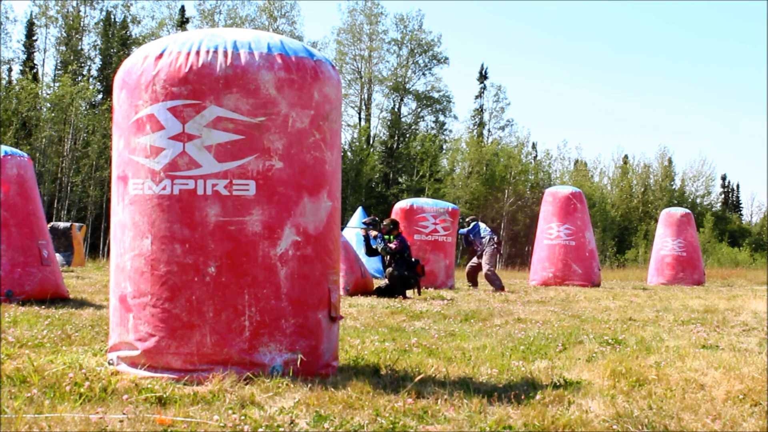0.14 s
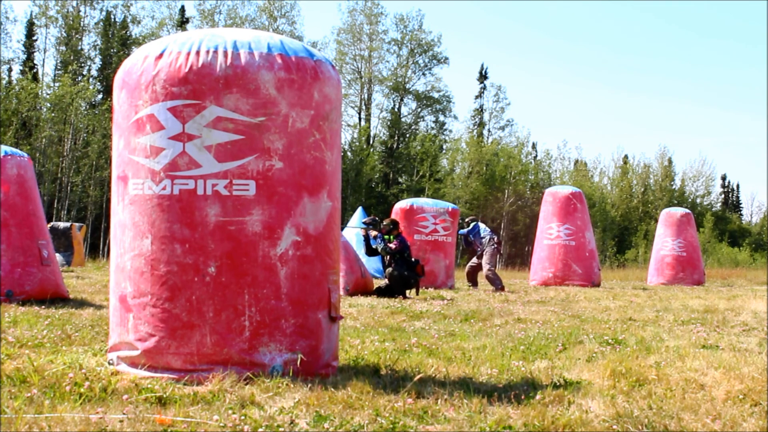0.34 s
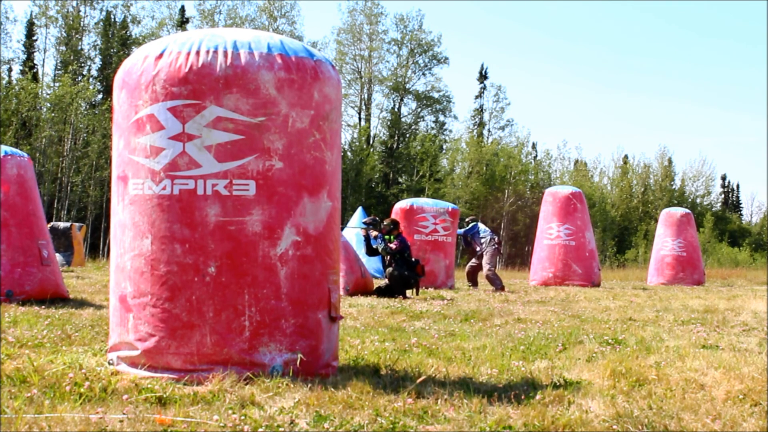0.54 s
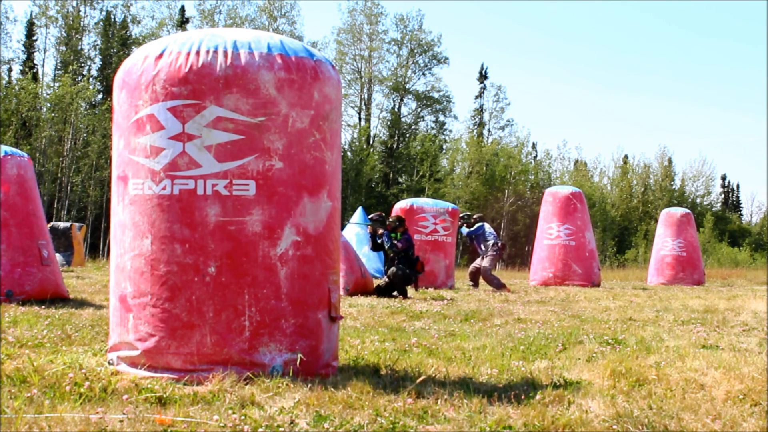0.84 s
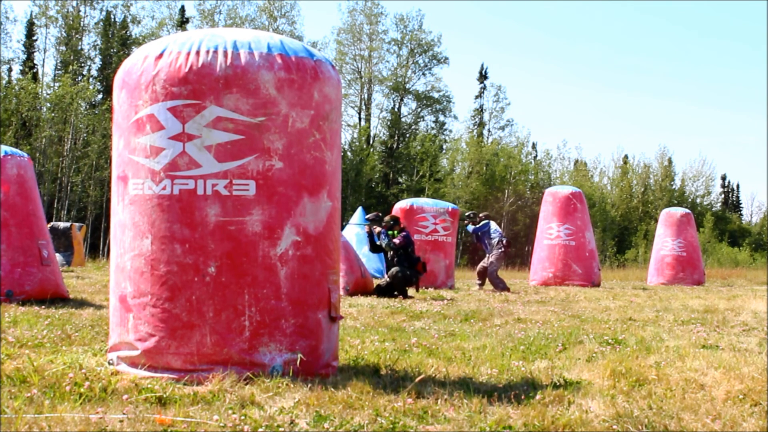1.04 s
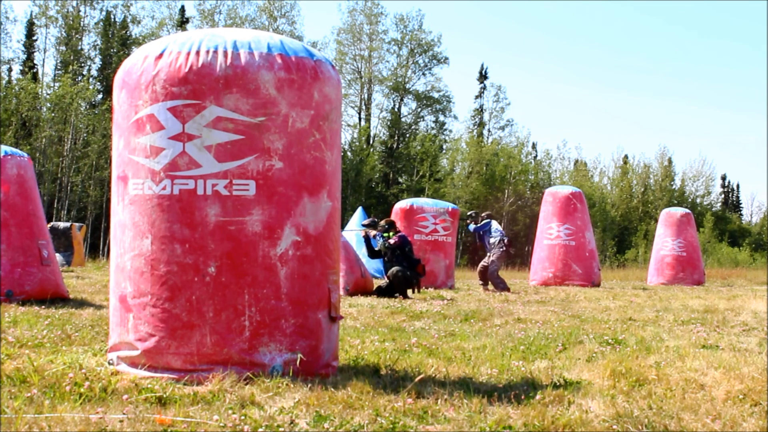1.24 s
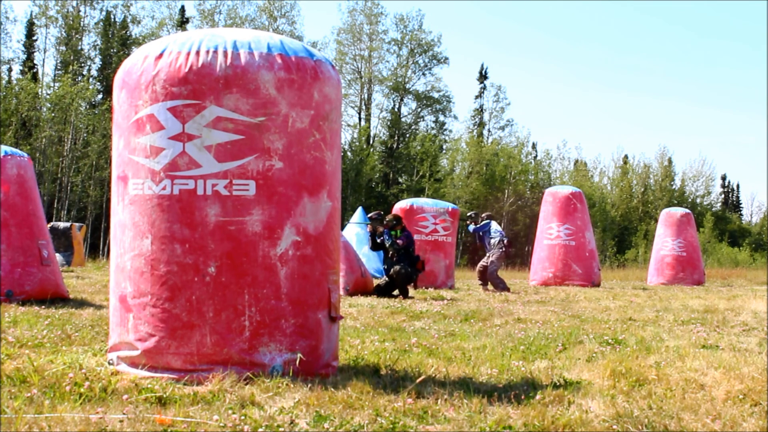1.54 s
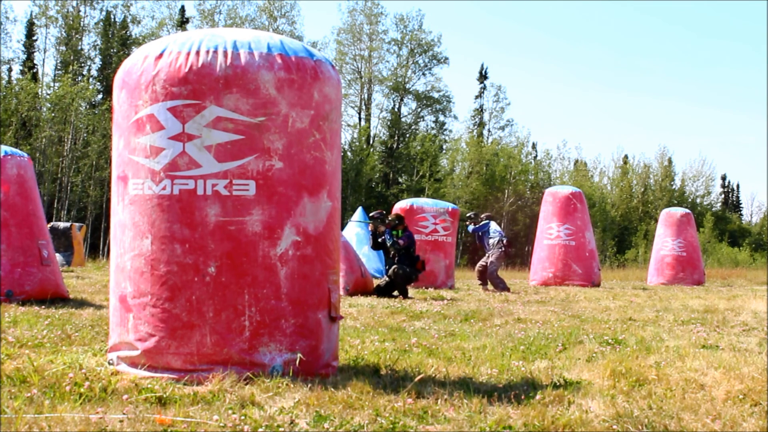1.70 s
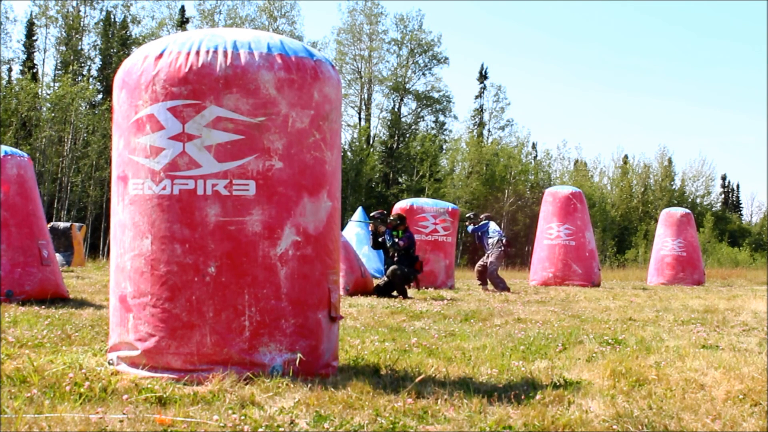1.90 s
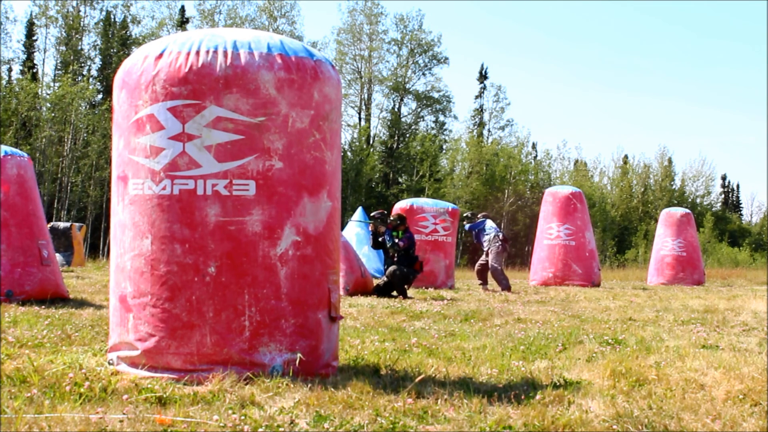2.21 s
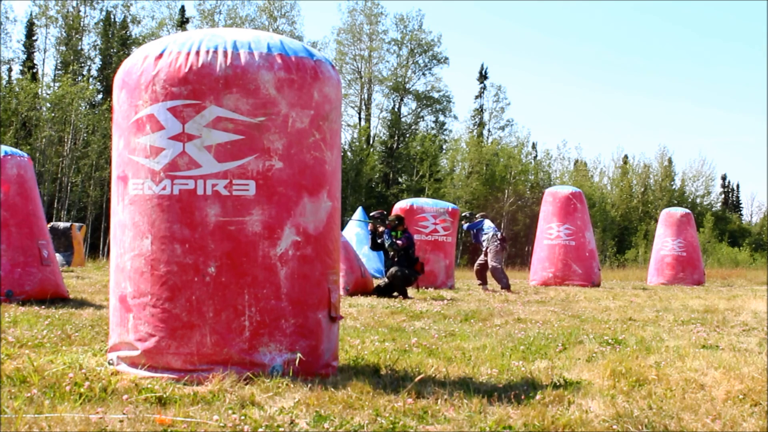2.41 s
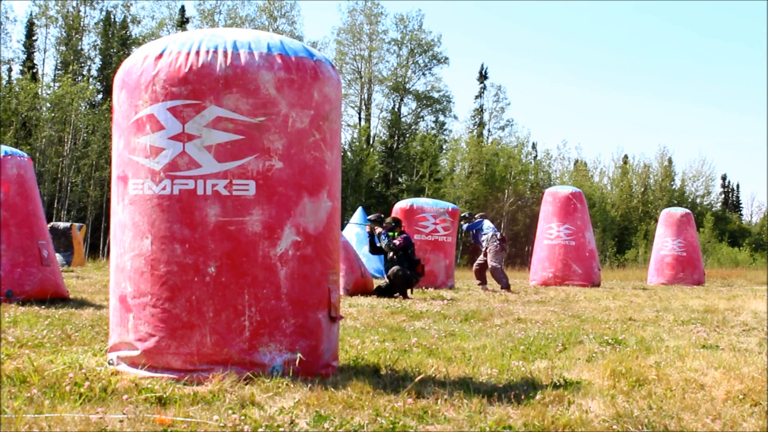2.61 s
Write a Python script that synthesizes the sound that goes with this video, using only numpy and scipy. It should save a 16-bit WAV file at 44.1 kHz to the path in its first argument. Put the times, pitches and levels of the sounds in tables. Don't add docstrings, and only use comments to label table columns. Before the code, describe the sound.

After half a second of quiet outdoor air, far paintball pops run in a fast string; close shots with puffs of gas join, mixed with sharp cracks and boomy skin slaps, ending in steady rapid fire.

```python
import sys
import numpy as np
from scipy import signal
from scipy.fft import rfft, irfft
from scipy.io import wavfile
from scipy.ndimage import uniform_filter1d

SR = 44100
rng = np.random.default_rng(int(sys.argv[2]) if len(sys.argv) > 2 else 0)


def bounce(signal):
    frames = np.transpose(np.atleast_2d(signal))
    limited = np.clip(frames, -1, 1)
    pcm = np.round(limited * 32767).astype(np.int16)
    wavfile.write(sys.argv[1], SR, pcm)


def invert_db(level):
    return 10 ** (np.asarray(level, dtype=float) / 20)


N = 121275

# frequency_hz, density_db (per Hz)
JET_SPECTRUM = [(350, -39), (600, -14.5), (1330, -5), (2310, 0), (3890, -1), (5330, -5.5), (5950, -7.5),
                (14100, -15), (16000, -25)]
BARREL_HZ = 2320
LEAD_S = .001


def evened(x):
    return x / np.sqrt(np.mean(x ** 2) + 1e-20)


def read(points, hz):
    f, value = np.transpose(points)
    return np.interp(np.log(hz + 1), np.log(f + 1), value)


def add(mix, s, sound):
    part = mix[round(s * SR):][:len(sound)]
    part += sound[:len(part)]


def dull(x, hz):
    return signal.lfilter(*signal.butter(2, min(hz, 20000) / (SR / 2)), x)


def hiss(points, count):
    spectrum = rfft(rng.standard_normal(count))
    gain = invert_db(read(points, np.fft.rfftfreq(count, 1 / SR)))
    return evened(irfft(spectrum * gain, count))


def ring(hz, t60, count=4000):
    t = np.arange(count) / SR
    return np.sin(2 * np.pi * hz * t) * invert_db(-60 * t / t60)


def echoes(mix, s, db, sound, paths):
    scatter_ms, scatter_db = .12, 1
    for (ms, path_db, hz), (a, b) in zip(paths, rng.standard_normal((len(paths), 2))):
        delay_ms = ms + scatter_ms * a * min(ms / 3, 1)
        sharpened = sound + 2.3 * (hz / 16000) ** 3 * np.gradient(sound)
        add(mix, s + delay_ms / 1000, invert_db(db + path_db + scatter_db * b) * dull(sharpened, hz))


def field(x, db, top_hz=16000):
    # frequency_hz, t60_s
    decay_times = [(100, 0.72), (250, 0.25), (450, 0.07), (1500, 1.86), (4000, 1.75), (6000, 0.85),
                   (8000, 0.04), (16000, 0.01)]
    # frequency_hz, level_db
    strengths = [(60, 8), (250, 7), (600, -1), (1500, 5.5), (3000, 0.5), (6000, 4), (10000, 22), (16000, 7)]
    gap_s, patchy_db, flicker_db = 0.0068, 0.5, 2.2
    hz, t, z = signal.stft(dull(x, top_hz), SR, nperseg=256, noverlap=192)
    power = uniform_filter1d(abs(z) ** 2, size=9, axis=0)
    fade = invert_db(-60 * t / read(decay_times, hz)[:, None]) ** 2
    fade = fade * np.clip(t / gap_s - .5, 0, 1)
    response = fade * invert_db(read(strengths, hz)[:, None]) ** 2 / 100
    linger = abs(signal.fftconvolve(power, response, axes=1)[:, :len(t)])
    a, b, c = rng.standard_normal((3,) + z.shape)
    patches = evened(uniform_filter1d(uniform_filter1d(c, size=40, axis=0), size=3, axis=1))
    flicker = evened(uniform_filter1d(c, size=3, axis=1)[:60].mean(0))
    unevenness = invert_db(patchy_db * patches + flicker_db * flicker)
    tail = signal.istft(np.sqrt(linger) * (a + 1j * b) * unevenness, SR, nperseg=256, noverlap=192)[1]
    return x + invert_db(db) * tail[:N]


def air():
    # frequency_hz, density_db (per Hz)
    quiet = [(59, -35), (100, -5), (129, -0.5), (637, -3.5), (724, -7), (840, -4), (5960, -16),
             (15200, -22), (16200, -24)]
    air_db, wind_db, wind_hz = -53, -63, 55.3
    slow = [uniform_filter1d(uniform_filter1d(rng.standard_normal(N), 2000), 2000) for _ in range(2)]
    swell, gust = evened(slow[0]), evened(slow[1])
    wind = hiss([(15, -20), (wind_hz, 0), (110, -14), (300, -50), (16000, -90)], count=N)
    return invert_db(air_db + .5 * swell) * hiss(quiet, count=N) + invert_db(wind_db + 3 * gust / 2) * wind


def debris():
    # start_s, level_db, t60_s
    rattles = [
        (1.952, -24.5, 0.34),
        (1.9501, -19, 0.02),
        (1.963, -20, 0.012),
        (2.124, -24, .4),
        (1.5, -35.5, 0.24),
        (1.489, -44, 0.37),
    ]
    # frequency_hz, density_db (per Hz)
    rattle_spectrum = [(200, -6.5), (600, -7), (1200, 6), (2000, -0.5), (3500, -15.5), (16000, -57)]
    # start_s, level_db
    specks = [(1.029, -30), (1.073, -21), (1.173, -46), (1.187, -26), (1.2575, -33), (1.2645, -38),
              (1.348, -38), (1.3508, -33), (1.3568, -28), (1.502, -37), (1.551, -38), (1.562, -35),
              (1.701, -42), (1.9695, -26), (2.274, -26), (2.382, -31), (2.621, -26), (2.661, -27),
              (2.7185, -32)]
    # start_s, length_s, level_db
    sprays = [
        (0.799, 0.047, -44),
        (.96, 0.076, -49.5),
        (1.189, 0.012, -41),
        (2.666, 0.044, -58),
    ]
    out, t = np.zeros(N), np.arange(12000) / SR
    for s, db, t60 in rattles:
        lumps = invert_db(3.1 * evened(uniform_filter1d(rng.standard_normal(len(t)), 60)))
        envelope = invert_db(db - 60 * t / t60) * np.minimum(t / 0.00077, 1)
        add(out, s, envelope * lumps * hiss(rattle_spectrum, count=12000))
    for s, db in specks:
        add(out, s, invert_db(db - 60 * t[:200] / 0.0015) * dull(rng.standard_normal(200), 9400))
    for s, length, db in sprays:
        k = round(length * SR)
        clumps = invert_db(2.3 * evened(uniform_filter1d(rng.standard_normal(4000), 40)))
        grains = rng.standard_normal(4000) * clumps
        add(out, s, invert_db(db) * np.hanning(k) ** 0.24 * np.diff(grains)[:k])
    return out


def slap(ms):
    return -np.exp(-abs((np.arange(4000) / SR - LEAD_S) * 1000 / ms) ** 1.7)


def bunkers():
    # start_s, slap_db, boom_db, boom_hz, slap_width_ms
    hits = [(0.7904, -12, -15, 161, 0.35), (1.0482, -0.5, -9, 170, 0.28), (1.2426, -6.5, -19, 146, 0.11),
            (1.3337, -2, -14.5, 120, 0.13), (1.4881, -4, -8, 145, 0.11), (1.5795, 0.5, -7.5, 142, 0.14),
            (1.9443, -6, -22, 240, 0.25), (1.9450, -14, -6, 240, .2), (1.9485, -12, -16, 270, 0.2),
            (1.9556, -18, -18, 190, 0.44), (1.9612, -13, -17, 200, 0.15), (1.9661, -12, -12, 190, 0.1),
            (2.1216, -7.5, -14, 138.5, 0.23), (2.1225, 1.5, -14.5, 145, 0.15),
            (2.4659, -6.5, -11, 147, 0.13), (2.5416, 1, -10, 142, 0.11), (2.5554, -1.5, -9, 140, 0.13),
            (2.607, -4.5, -20.5, 132, 0.082)]
    # delay_ms, level_db, top_hz
    hit_paths = [(0.694, -27, 5500), (5.5, -21, 790), (13.97, -22, 6100), (22.7, -19.5, 9400)]
    # start_s, level_db, width_ms
    whips = [
        (1.9502, -3, .18),
        (1.9512, -10, .3),
        (1.9631, -8, .25),
        (2.1272, -15, .15),
        (2.1314, -12, .15),
        (2.1326, -13, .15),
    ]
    # start_s, level_db,
    # width_ms
    rebounds = [(1.0488, -3, 0.16), (1.2438, -27, .08), (1.3341, -8.5, .14), (1.3359, -18, .12),
                (1.4885, -5.5, .26), (1.5802, -5.5, 0.13), (2.4666, -13, 0.15), (2.5422, -10, 0.11),
                (2.556, -12, .1), (2.6074, -23, 0.068), (2.6386, -13.5, 0.086)]
    boom_t60, boom_lag_s, overtone_ratio, overtone_db = .019, .0011, 3.53, -11
    push, push_s = .42, .0024
    return_turns, return_db, return_ms = .78, -9, .6
    shell_hz, shell_t60, shell_db = 3150, .007, -19
    flap_hz, flap_t60, flap_db = 760, 0.12, -27
    out, t = np.zeros(N), np.arange(4000) / SR
    for s, db, boom_db, hz, ms in hits:
        add(out, s - LEAD_S, invert_db(db) * slap(ms))
        echoes(out, s - LEAD_S, db, np.gradient(slap(ms)) * ms * SR / 1000, hit_paths)
        boom = ring(hz, boom_t60) + invert_db(overtone_db) * ring(hz * overtone_ratio, boom_t60)
        add(out, s + boom_lag_s, invert_db(boom_db + 2.2) * boom)
        shove = np.exp(-t / push_s) - np.exp(-t / .0003)
        add(out, s + 0.00026, invert_db(boom_db + 3) * push * shove)
        dent = -np.exp(-((t - .003) * 1000 / return_ms) ** 2)
        add(out, s + return_turns / hz - .003, invert_db(boom_db + return_db) * dent)
        shell = (ms < .2) * ring(shell_hz * rng.uniform(.9, 1.05), shell_t60)
        add(out, s + .0002, invert_db(db + shell_db) * shell)
        flap = hiss([(200, -10), (flap_hz, 0), (4000, -16), (16000, -40)], count=4000)
        add(out, s, invert_db(.5 * (db + boom_db) + flap_db - 60 * t / flap_t60) * flap)
    for s, db, ms in whips:
        add(out, s - LEAD_S, -invert_db(db) * slap(ms))
    for s, db, ms in rebounds:
        add(out, s - LEAD_S, invert_db(db) * slap(ms))
    return out


def pop(hz):
    width_ms, ring_t60 = .058, 0.0099
    suck, suck_lag, suck_wide = .85, 2.7, 1.3
    u = (np.arange(400) / SR - LEAD_S) * 1000 / width_ms
    jump = np.exp(-u ** 2) - suck * np.exp(-((u - suck_lag) / suck_wide) ** 2)
    edge = np.gradient(np.exp(-(u * 4) ** 2)) * 2
    barrel = np.pad(ring(hz * rng.uniform(.98, 1.02), ring_t60, count=340), (60, 0))
    upper = np.pad(ring(3380, ring_t60, count=340), (60, 0))
    return jump + invert_db(-10) * edge + invert_db(-17.5) * barrel + invert_db(-16.5) * upper


def marker(shots, paths, hiss_db, hiss_t60, thud_db, thud_s):
    out, t = np.zeros(N), np.arange(4000) / SR
    thud = ring(190, 0.019) + 0.46 * ring(953, 0.021) + 0.41 * ring(423, 0.019)
    for s, db, echo_db, hz in shots:
        add(out, s - LEAD_S, invert_db(db) * pop(hz))
        echoes(out, s - LEAD_S, echo_db, pop(hz), paths)
        add(out, s, invert_db(echo_db + hiss_db - 60 * t / hiss_t60) * hiss(JET_SPECTRUM, count=4000))
        add(out, s + thud_s, invert_db(echo_db + thud_db) * thud)
    return out


def far_marker():
    # start_s, pop_db, echo_db, barrel_hz
    shots = [
        (.4887, -34, -38, 2800),
        (.5029, -11.5, -9.5, 2830),
        (.5862, -12.5, -10, 2550),
        (.6697, -6.5, -11.5, 2270),
        (.7534, -4.5, -10, 2450),
        (.8368, -11.5, -13.5, 2220),
    ]
    # delay_ms, level_db, top_hz
    paths = [(0.444, -4.5, 8800), (3.24, -6, 7600), (3.823, 0.5, 3500), (4.806, -1, 6700), (4.83, -9, 9000),
             (6.974, -4, 5700), (10.1, -27, 9000), (13.7, -10, 17300), (16.63, -11, 7600),
             (18.5, -26, 11000), (46, -17, 13000)]
    return marker(shots, paths, hiss_db=-18.5, hiss_t60=0.12, thud_db=-9.5, thud_s=0.00527)


def aimed_marker():
    # start_s, pop_db, echo_db, barrel_hz
    shots = [
        (1.0498, 9, 1, 2240),
        (1.1972, 11, -1.5, 2260),
        (2.2527, 8, -6.5, 2280),
        (2.4015, 4.5, -5.5, 2200),
        (2.6388, -14, -26, 2300),
        (2.69, -25.5, -24, 2300),
    ]
    # delay_ms, level_db, top_hz
    paths = [(0.464, -2.5, 9000), (2.749, -3, 16000), (3.306, -13, 9000), (5.03, -16, 4700),
             (8.95, -19, 9800), (18.1, -23, 7400), (23, -16, 14800), (36.6, -26, 13000)]
    return marker(shots, paths, hiss_db=-18, hiss_t60=.03, thud_db=-18, thud_s=0.00054)


def near_marker():
    # start_s, pop_db, jet_db, thud_db
    shots = [(0.7814, -4.5, -13.5, -16), (0.9209, -9, -14, -13), (1.04, 0.5, -14, -21),
             (1.5727, -9, -20.5, -18.5), (1.7129, -7, -21, -20), (1.8498, -7, -15, -14.5),
             (1.986, -6.5, -16, -15.5), (2.0656, -3.5, -16, -14.5), (2.1468, -10, -23.5, -32),
             (2.227, -16, -21, -20.5), (2.3069, -10, -21, -22), (2.387, -8, -21.5, -19.5),
             (2.4674, -11.5, -24.5, -36), (2.5475, -17, -24.5, -21)]
    # delay_ms, level_db, top_hz
    paths = [(0.436, 0.5, 10700), (4.3, -7, 9000), (5.563, -14, 20000), (15.48, -12, 8100),
             (18.4, -10.5, 6300), (22.06, -16, 6300), (23, -39, 6000), (27.15, -13, 12000),
             (30.6, -17, 14000)]
    hold_s, fall_t60 = 0.0064, 0.015
    jet_echo_s, jet_echo_db, jet_echo_t60 = 0.015, -8.5, 0.098
    thud_hz, thud_lag_s, thud_t60 = 159, 0.00047, 0.027
    bolt_s, bolt_db, bolt_hz = .041, -23, (8500, 12800)
    leak_db, leak_t60 = -28, 0.46
    out, t = np.zeros(N), np.arange(4000) / SR
    jet = np.minimum(t / 0.004, 1) * invert_db(-60 * np.maximum(t - hold_s, 0) / fall_t60)
    for s, db, jet_db, thud_db in shots:
        add(out, s - LEAD_S, invert_db(db) * pop(BARREL_HZ))
        echoes(out, s - LEAD_S, .5 * (db + jet_db) + 2.5, pop(BARREL_HZ), paths)
        add(out, s - .0023, invert_db(jet_db) * jet * hiss(JET_SPECTRUM, count=4000))
        jet_echo = dull(hiss(JET_SPECTRUM, count=4000), 6800)
        add(out, s + jet_echo_s, invert_db(jet_db + jet_echo_db - 60 * t / jet_echo_t60) * jet_echo)
        thud = ring(thud_hz, thud_t60) + 0.93 * ring(367, 0.016)
        add(out, s + thud_lag_s, -invert_db(thud_db) * thud)
        bolt = sum(ring(hz * rng.uniform(.96, 1.04), .007) for hz in bolt_hz)
        add(out, s + bolt_s, invert_db(jet_db + bolt_db) * bolt)
        leak = np.diff(rng.standard_normal(8001)) * invert_db(-60 * np.arange(8000) / SR / leak_t60)
        add(out, s, invert_db(jet_db + leak_db) * dull(leak, 10500))
    return out


def ducking(x):
    from_db, share, recover_db_per_s = -19.5, 0.42, 13
    power_db = 10 * np.log10(abs(uniform_filter1d(x ** 2, size=200)) + 1e-12)
    rise = np.arange(N) / SR * recover_db_per_s / share
    held_db = np.maximum.accumulate(power_db + rise) - rise
    return invert_db(-share * np.maximum(held_db - from_db, 0))


def scene():
    play = field(far_marker(), -12) + field(near_marker(), -13.5) + field(aimed_marker(), -39)
    play = play + field(bunkers(), -13, top_hz=4500) + debris()
    low_cut_hz = 74
    carried = signal.lfilter(*signal.butter(2, low_cut_hz / (SR / 2), "high"), play)
    return (carried + ducking(play) * air())[None]


def top_cut(x):
    return signal.sosfilt(signal.butter(12, 16480, fs=SR, output="sos"), x)


def record(dry):
    edge = signal.firwin(161, 15950, window=("kaiser", 9), fs=SR)[None]
    mix = signal.oaconvolve(np.clip(dry, -1, 1), edge, "same")
    return top_cut(mix)


dry = scene()
out = record(dry)
bounce(out)
```